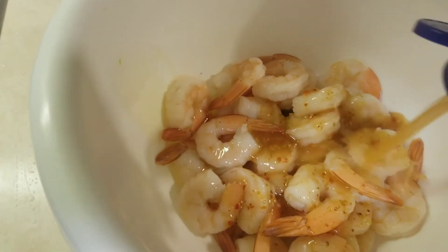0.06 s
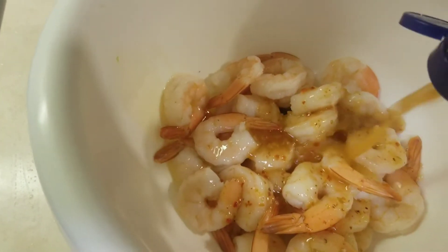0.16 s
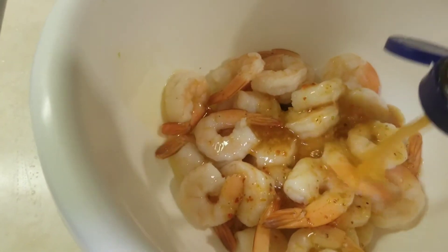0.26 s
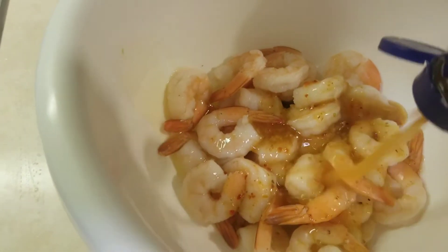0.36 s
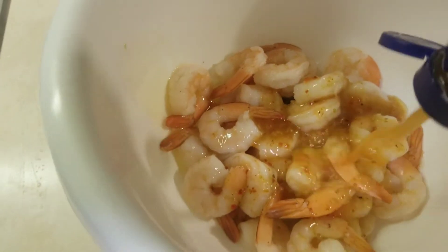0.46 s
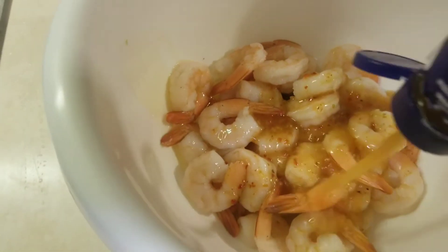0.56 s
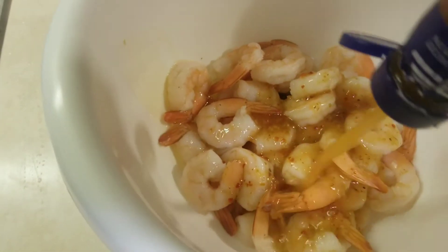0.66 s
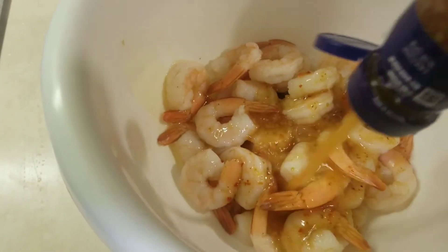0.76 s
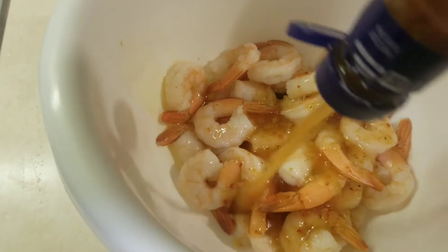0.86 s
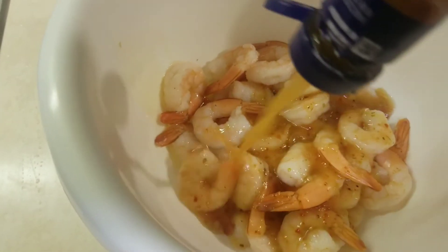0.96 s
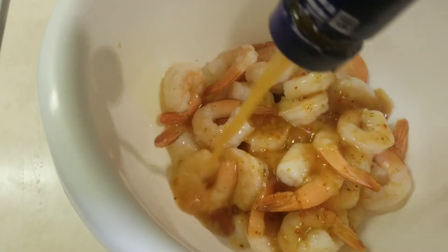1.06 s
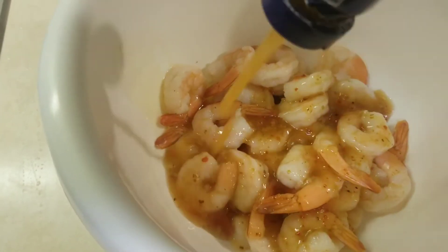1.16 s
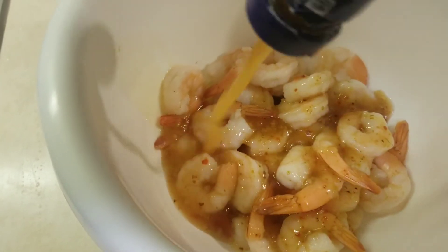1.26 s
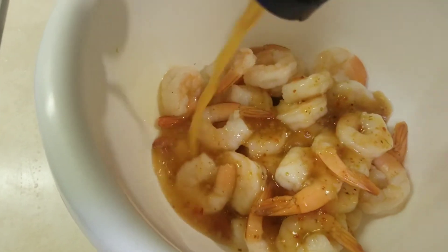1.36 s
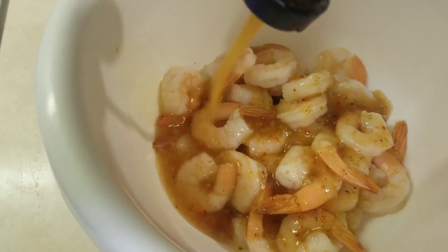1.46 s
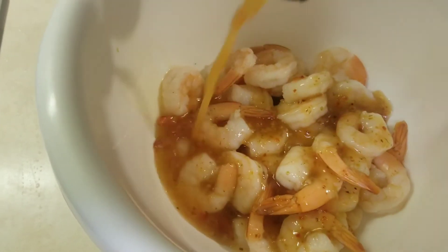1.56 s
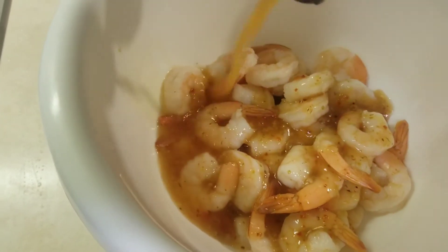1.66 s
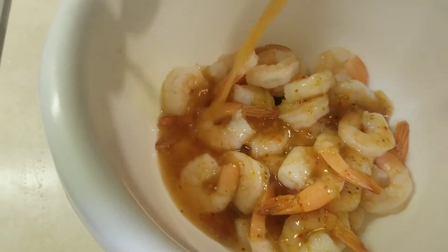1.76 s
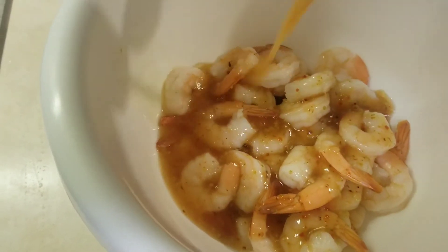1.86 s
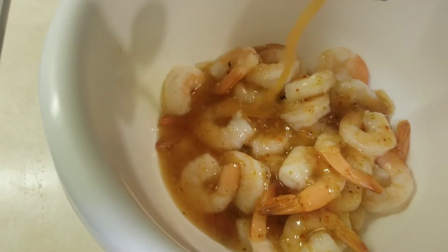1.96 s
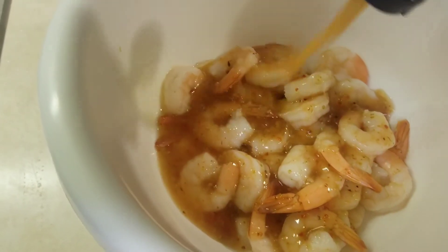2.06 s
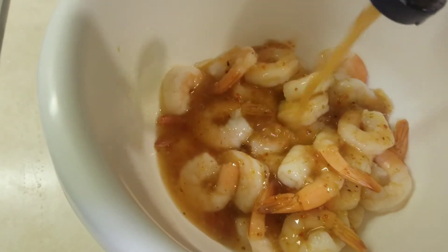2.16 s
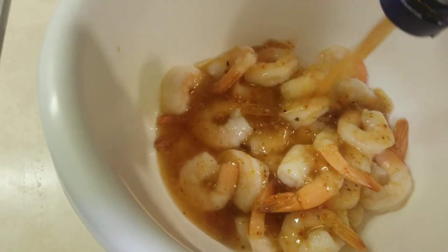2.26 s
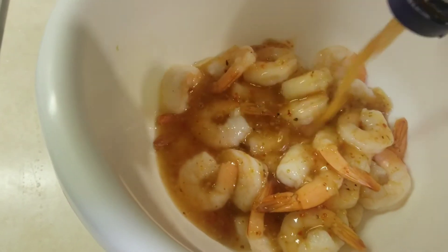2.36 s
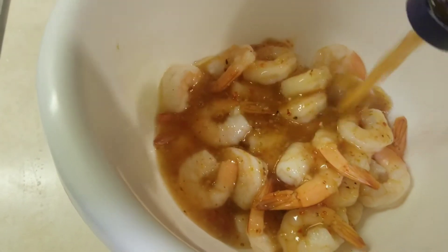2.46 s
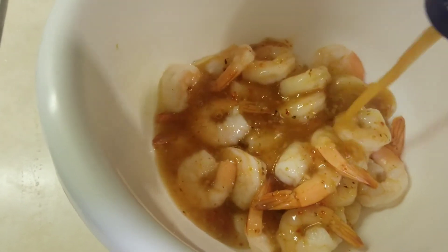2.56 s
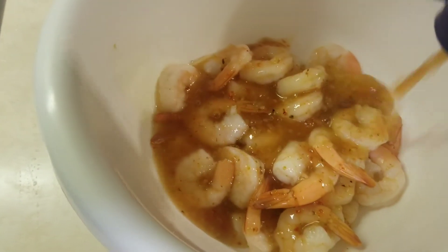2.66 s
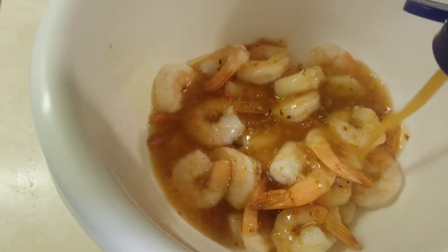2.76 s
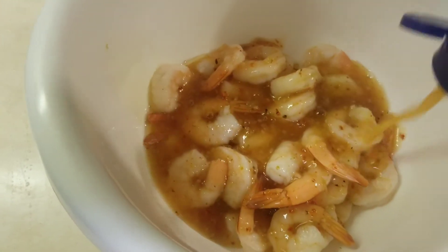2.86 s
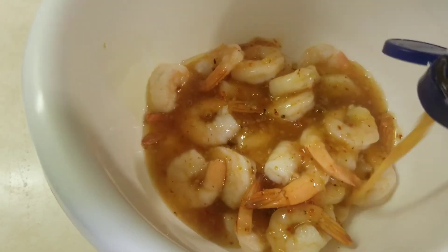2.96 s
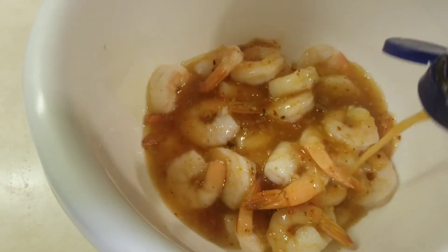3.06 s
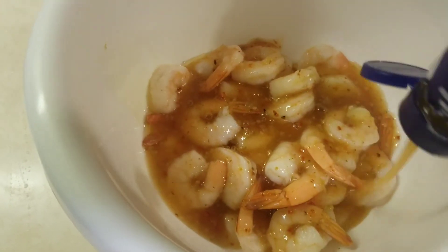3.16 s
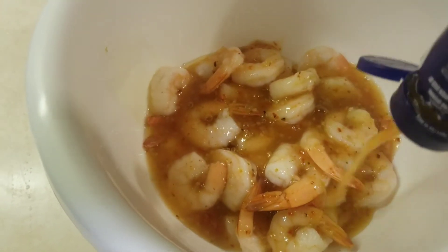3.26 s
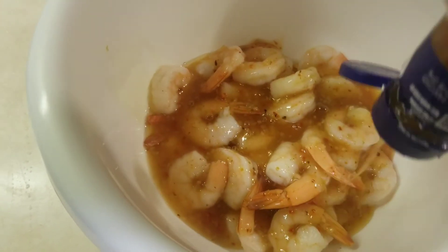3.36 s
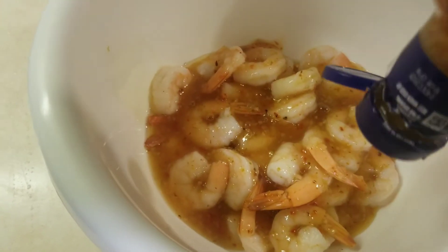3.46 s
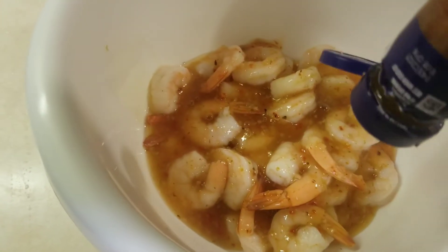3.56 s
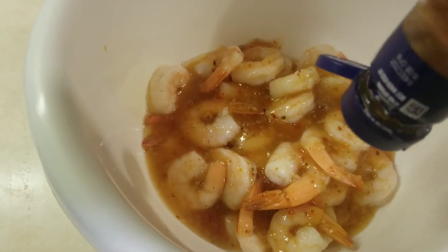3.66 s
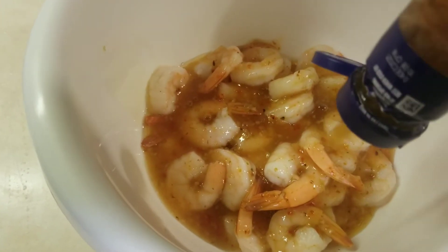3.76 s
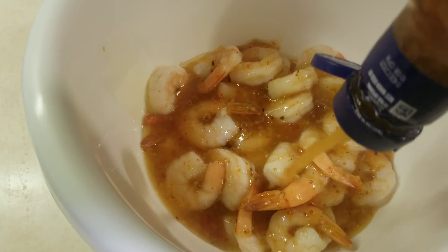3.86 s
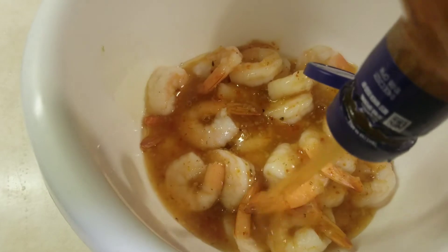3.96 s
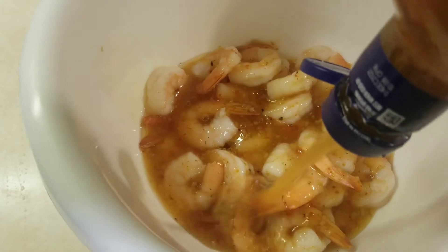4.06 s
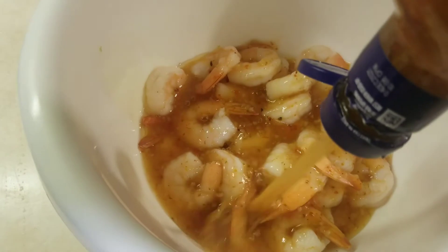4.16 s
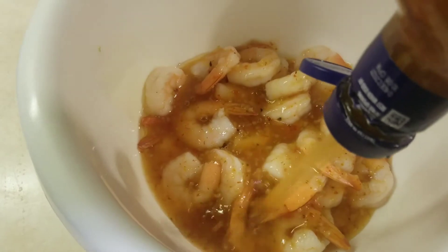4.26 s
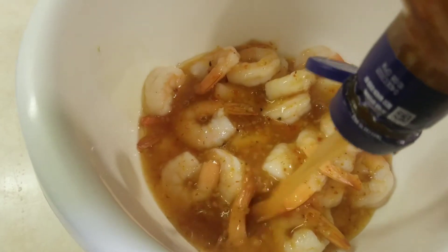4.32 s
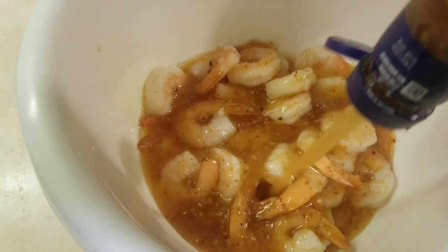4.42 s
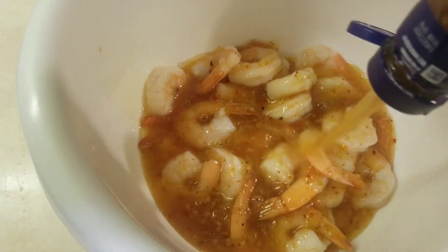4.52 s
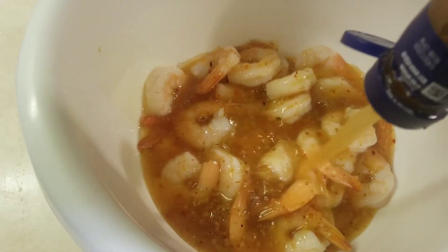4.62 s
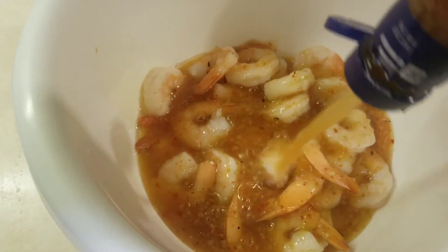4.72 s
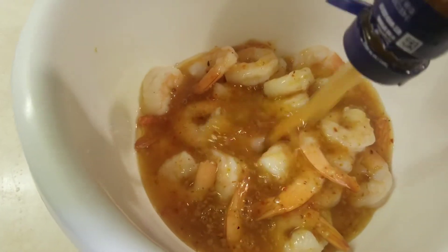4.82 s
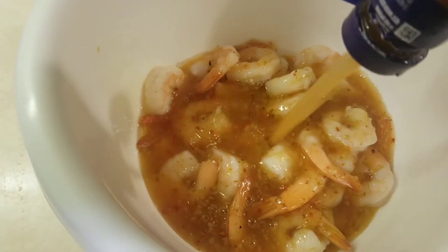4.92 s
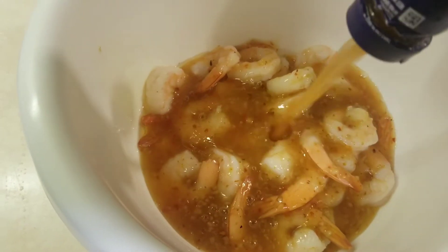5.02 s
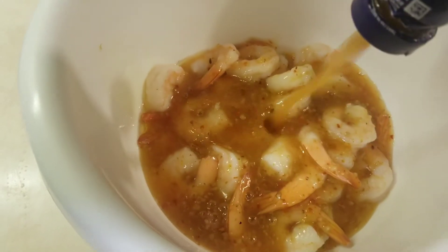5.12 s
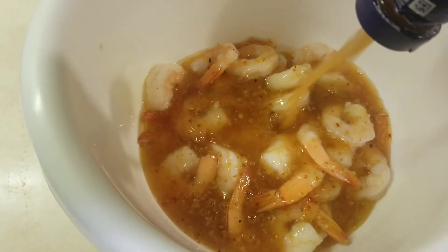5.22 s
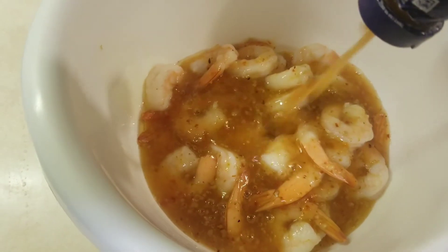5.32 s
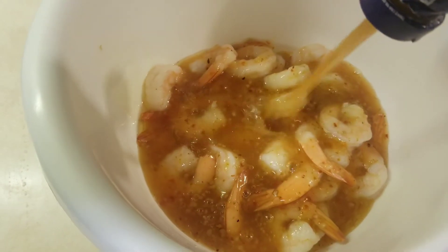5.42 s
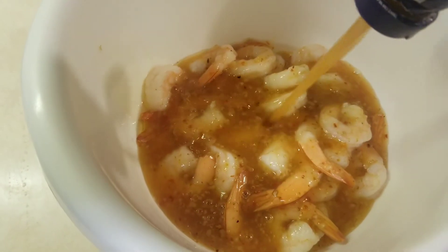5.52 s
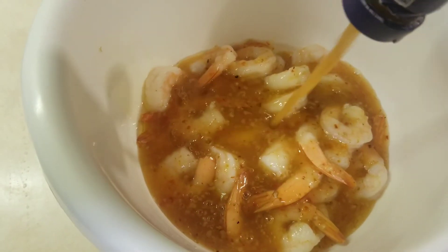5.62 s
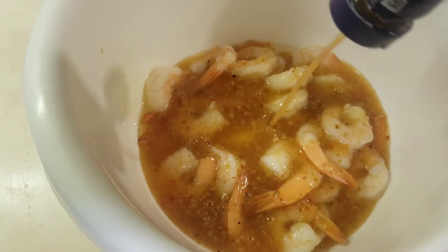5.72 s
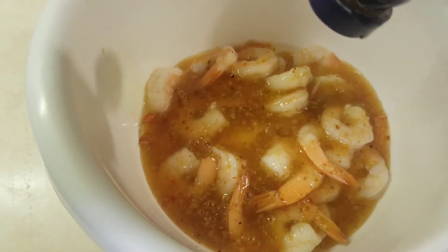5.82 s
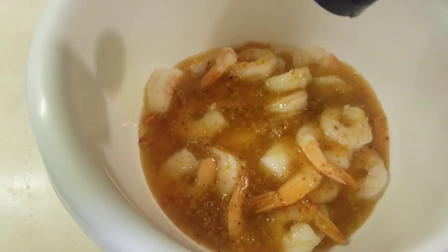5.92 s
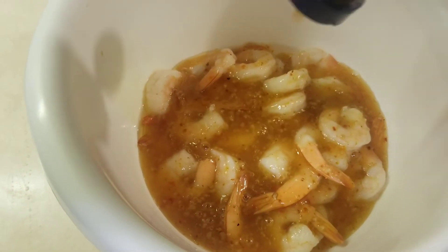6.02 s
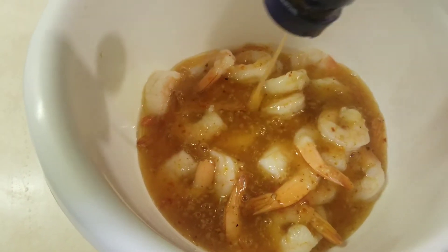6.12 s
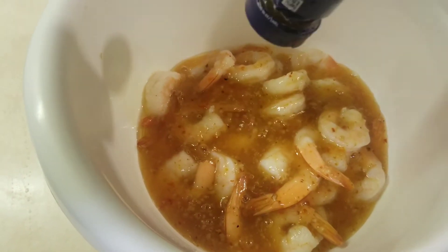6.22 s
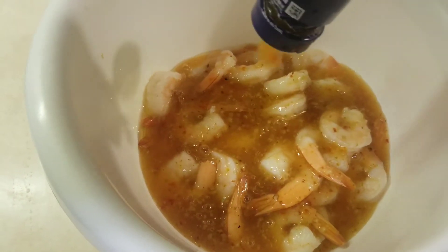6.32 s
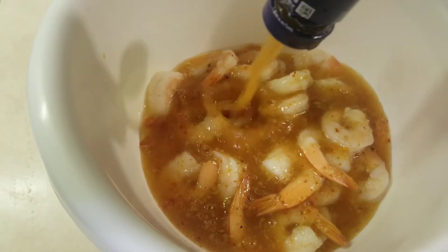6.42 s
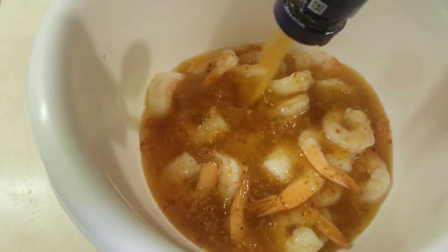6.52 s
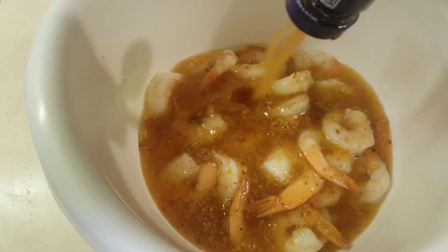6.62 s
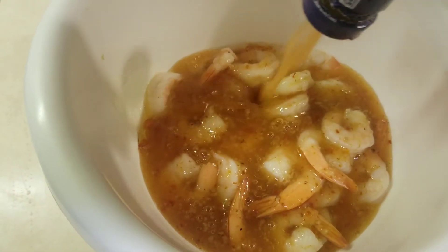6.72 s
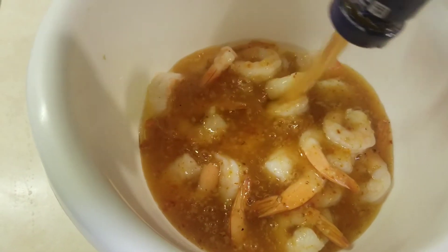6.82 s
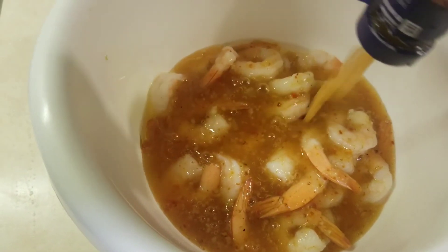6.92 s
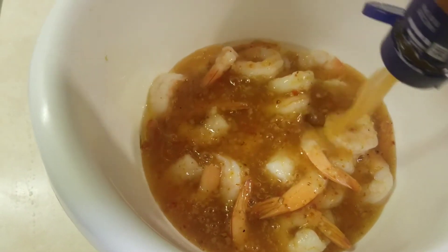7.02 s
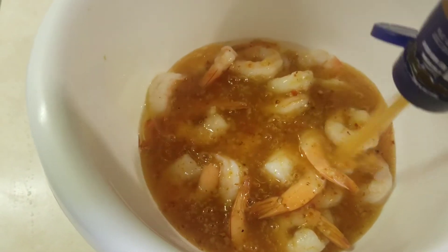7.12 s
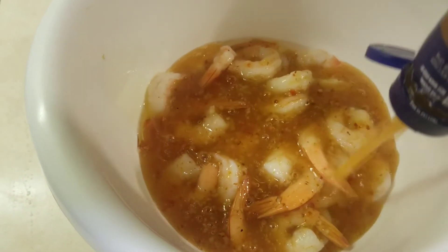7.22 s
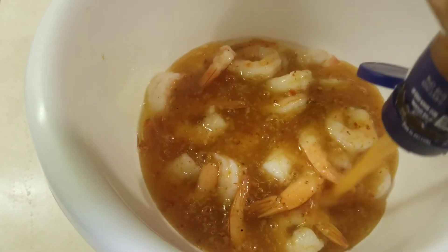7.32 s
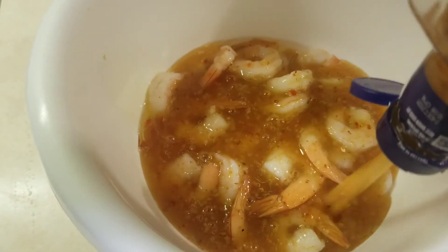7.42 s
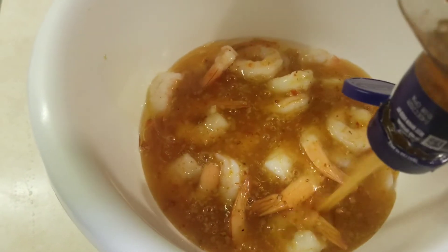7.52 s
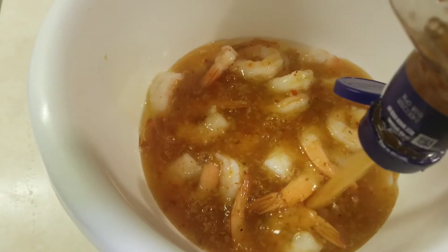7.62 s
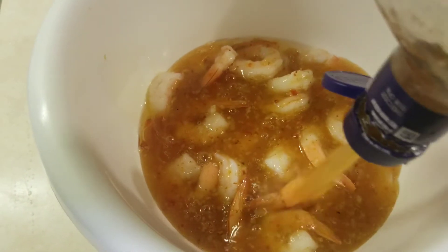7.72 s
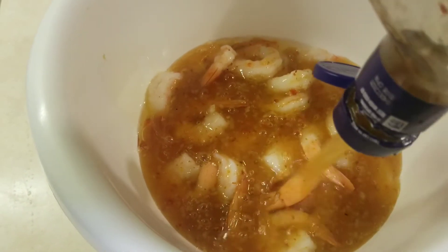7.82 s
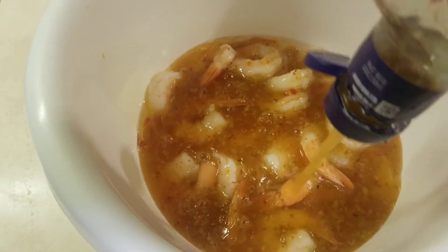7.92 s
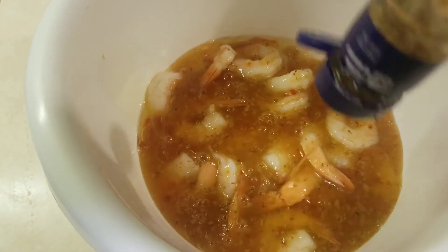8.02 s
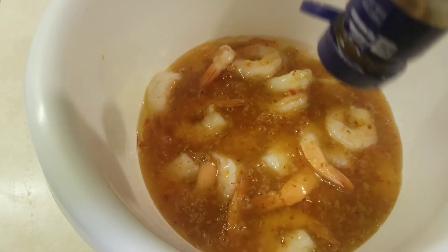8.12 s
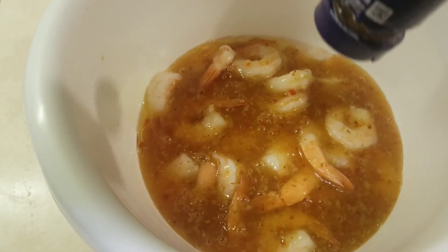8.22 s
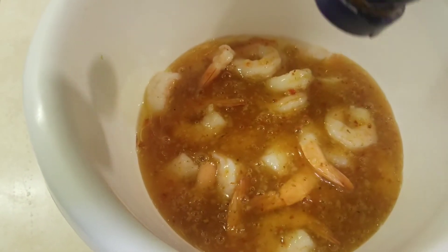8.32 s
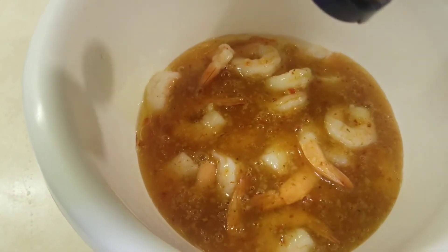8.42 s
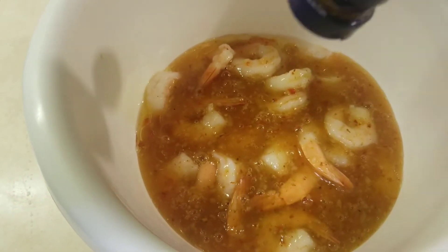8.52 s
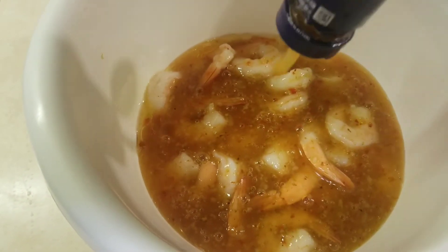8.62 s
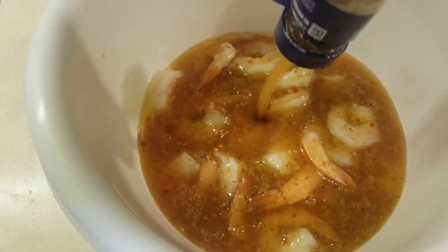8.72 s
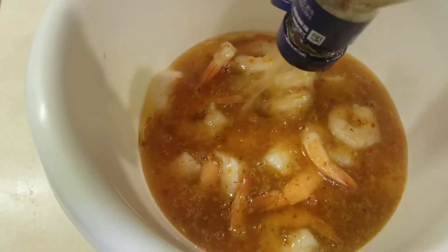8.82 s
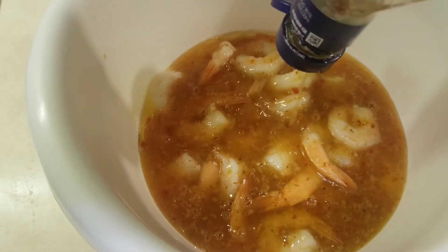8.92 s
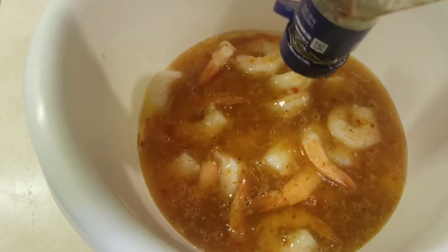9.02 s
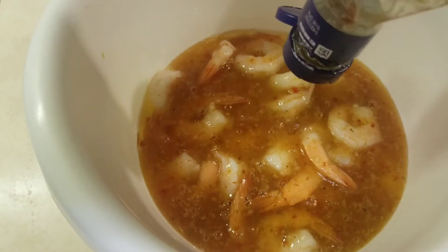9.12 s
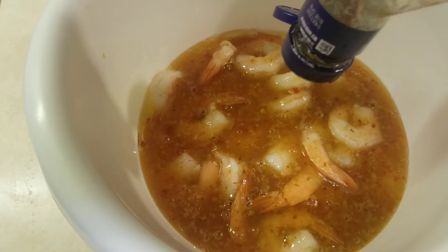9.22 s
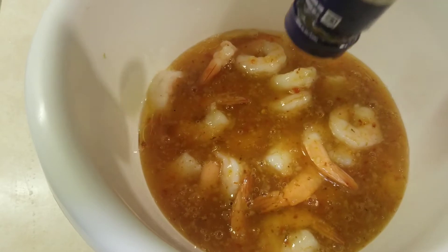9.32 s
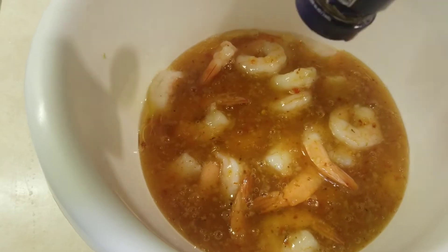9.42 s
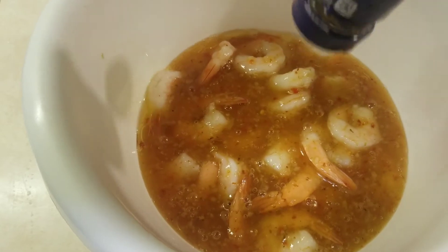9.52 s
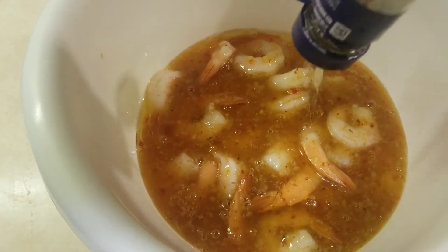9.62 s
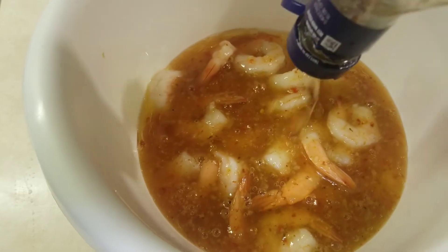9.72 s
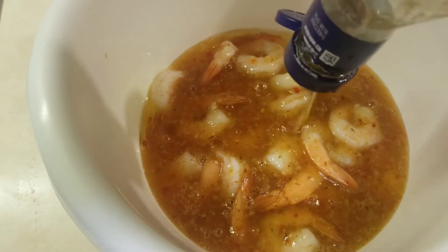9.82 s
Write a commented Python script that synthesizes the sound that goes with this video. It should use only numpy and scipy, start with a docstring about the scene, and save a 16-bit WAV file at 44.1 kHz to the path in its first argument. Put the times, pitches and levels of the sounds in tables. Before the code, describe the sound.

In a quiet home kitchen, very close to the microphone, dressing is poured from a plastic bottle over shrimp in a bowl. A light wet trickle crackles first, then the bottle gulps air and pops. A second, fuller squeeze splashes and bubbles into the pool, then a third. Finally the nearly empty bottle spits raspy air, its walls snap, and low glugs ring.

```python
"""Dressing squeezed onto shrimp

Thick dressing pours from a plastic bottle into a large bowl, close by in a kitchen: three squeezes drive
splashes, trapped bubbles, fizz and drumming, all as shaped noise and short damped rings. Films burst with
ringing cavities, air sputters through the nozzle as coloured crackle, gulped air rings low and the walls
snap as sets of modes. Bowl echoes, a short kitchen tail, room air and a faint appliance hum lie around it."""
import sys
import numpy as np
from scipy import signal
from scipy.fft import rfft, irfft, next_fast_len
from scipy.io import wavfile
from scipy.ndimage import map_coordinates

SR = 44100
rng = np.random.default_rng(int(sys.argv[2]) if len(sys.argv) > 2 else 0)


def generate_wav(signal):
    """Clip the signal to [-1, 1] and save it as 16-bit WAV at the path in sys.argv[1]."""
    frames = np.transpose(np.atleast_2d(signal))
    scaled = np.clip(frames, -1, 1) * 32767
    pcm = np.round(scaled).astype(np.int16)
    wavfile.write(sys.argv[1], SR, pcm)


N = 435708
T = np.arange(N) / SR

# stereo lean of the near sources: f/Hz, left re right/dB
LEAN = [(200, 2.5), (500, -2), (1000, 5), (2200, 15), (4000, 8), (7000, -4), (12000, -1)]
# bottle wall buckling: t/s, level/dB, thump re level/dB (before a 2 dB cut), thump f/Hz, brightness f/Hz,
# wall tension as pitch ratio, panel ring re level/dB, panel f/Hz
SNAPS = [(3.5722, -14, -2, 213, 3200, 1.07, -0.5, 610), (5.855, -12, -1, 201, 5000, 1.02, -18, 850),
         (8.112, -13, 1, 188, 4870, 1.06, -15, 530), (8.4257, -13.5, 9.5, 227, 1790, 1.1, -0.5, 840),
         (8.482, -20.5, 3.5, 200, 2280, 1.32, 5, 945), (9.2256, -16.5, -1, 197, 3300, 1, -5, 686),
         (9.445, -14.5, 8, 237, 1860, 1.01, 0, 830), (9.5033, -23, 0, 200, 1870, 1.18, 6.5, 856)]
CAVITY_WAVER = 0.08  # pitch wander of a collapsing cavity, share (std)


def amp(db):
    """Decibels to gain."""
    return 10 ** (np.asarray(db) / 20)


def unit(x):
    """Scale to rms 1."""
    return x / np.sqrt(np.mean(x ** 2) + 1e-20)


def along(points, hz):
    """Read (f/Hz, value) points on a log-frequency axis."""
    f, v = np.transpose(points)
    return np.interp(np.log(hz + 1), np.log(f + 1), v)


def filtered(x, response):
    """Apply a response of frequency to x by FFT."""
    n = x.shape[-1]
    m = next_fast_len(n + min(n, 8192))
    spectrum = rfft(x, m) * response(np.fft.rfftfreq(m, 1 / SR))
    return irfft(spectrum, m)[..., :n]


def wobble(rate_hz):
    """Smooth random curve, rate_hz knots a second."""
    knots = rng.standard_normal(int(N * rate_hz / SR) + 4)
    return map_coordinates(knots, [T * rate_hz])


def wavering(share, count=24):
    """Random pitch bends of one cavity as it changes shape."""
    return share * rng.standard_normal(count)


def panned(db):
    """Left and right gains of constant power, left db above right."""
    ratio = amp(np.atleast_1d(db))
    return np.array([ratio, np.ones_like(ratio)]) * np.sqrt(2 / (1 + ratio ** 2))


def add(track, s, sound):
    """Mix a sound into a track at time s."""
    part = track[:, max(round(s * SR), 0):][:, :sound.shape[-1]]
    part += sound[..., :part.shape[-1]]


def spread(pair, spectrum, lean=LEAN):
    """Turn two unrelated signals into coloured stereo of rms 1, alike in the bass."""
    # f/Hz, left-right correlation
    alike = [(100, 0.93), (500, 0.69), (1500, 0.046), (4000, 0.054), (10000, 0.061)]

    def mid_side(hz):
        turn = np.arccos(np.clip(along(alike, hz), -1, 1)) / 2
        return amp(along(spectrum, hz)) * [np.cos(turn), np.sin(turn)]

    mid, side = filtered(pair, mid_side)
    stereo = np.array([mid + side, mid - side])
    return unit(filtered(stereo, lambda hz: panned(along(lean, hz))))


def ring(hz, life, attack, rise=0., lag=0., bends=(0, 0)):
    """Damped oscillation, envelope peak 1; pitch rises and bends as it dies, right side lags by lag/rad."""
    t = np.arange(int(8 * life * SR) + 8) / SR
    swell = (1 - np.exp(-t / attack)) * np.exp(-t / life)
    bend = np.interp(t, np.linspace(0, t[-1], len(bends)), bends)
    pitch_ratio = 1 + bend + rise * (np.tanh(t / life / 2) - .5)
    phase = 2 * np.pi * hz * np.cumsum(pitch_ratio) / SR
    return swell / swell.max() * np.sin(phase - np.array([[0], [lag]]))


def click(life, spectrum, size=1536):
    """Short decaying burst of coloured noise."""
    t = np.arange(size) / SR
    noise = rng.standard_normal((2, size))
    return unit(filtered(noise, lambda hz: amp(along(spectrum, hz)))) * np.exp(-t / life)


def crackle(per_second, size_db, hiss):
    """Two channels of tiny ruptures of very unequal size over a smooth hiss."""
    hit = rng.random(N) < per_second / SR
    size = amp(size_db * np.minimum(rng.exponential(size=N), 4))
    return unit(hit * size * rng.standard_normal((2, N))) + hiss * rng.standard_normal((2, N))


def bubbles(times, centre_hz, range_octaves, cycles, size_db, level_db=0):
    """Small damped bubbles of scattered pitch and size, one at each time, rising slightly in pitch."""
    pitch, size, pan, lag = rng.standard_normal((len(times), 4)).T[:, :, None]
    hz = np.reshape(centre_hz, (-1, 1)) * 2 ** (range_octaves * np.tanh(.7 * pitch))
    t = np.arange(int(4 * cycles * SR / np.mean(centre_hz)) + 64) / SR
    age = t * hz / cycles  # large bubbles ring longer
    gain = amp(size_db * np.minimum(size, 2) + np.reshape(level_db, (-1, 1)))
    swell = gain * (1 - np.exp(-5 * age)) * np.exp(-age) * (1 - (t / t[-1]) ** 2)
    phase = 2 * np.pi * hz * t * (1 + 0.045 * np.tanh(age))
    right_lag = (1.87 + lag) * np.minimum(hz / 3000, 1)
    where = (np.maximum(times, 0)[:, None] * SR).astype(int) + np.arange(len(t))
    left, right = panned(along(LEAN, hz) + 2 * pan)
    waves = left * swell * np.sin(phase), right * swell * np.sin(phase - right_lag)
    return np.array([np.bincount(where.ravel(), wave.ravel(), N)[:N] for wave in waves])


def background():
    """Room air as coloured noise and the slightly unsteady hum of an appliance as wavering sines."""
    # f/Hz, rms level/dB before a 2 dB lift
    hum_tones = [(118.4, -80.5), (193.8, -70.5), (333.8, -66.5), (1184, -76)]
    # f/Hz, relative level per Hz/dB
    air = [(15, -26), (25, -8), (53, 2.5), (82, -17), (123, 4), (149, -10), (242, -5.5), (277, -12),
           (427, -5.5), (936, -25), (1160, -13.5), (1500, -23), (2900, -23), (3600, -15), (4400, -26.5),
           (7710, -39.5), (16000, -34)]
    hum = np.zeros(N)
    for hz, db in hum_tones:
        tone = np.sin(2 * np.pi * hz * T + 0.63 * wobble(4.9))
        hum += amp(db + wobble(3.0)) * np.sqrt(2) * tone
    room = spread(rng.standard_normal((2, N)), air, lean=[(200, 0), (2000, 1)])
    return amp(2.0) * hum + amp(-57.0) * room


def kitchen(x):
    """Short diffuse tail of decaying noise, different for each place of the bottle: redrawn every 0.5 s."""
    # f/Hz, t60/s
    decay = [(150, 0.088), (400, 0.36), (1000, 0.46), (3000, 0.38), (7000, 0.29), (15000, 0.31)]
    colour = [(100, 7.0), (350, 4.5), (600, 2.5), (1000, -4.0), (3000, 2.5), (6000, 4.5), (14000, 2.5)]
    lean = [(500, -1.1), (2000, 0.35), (8000, -0.93)]
    block = SR // 2
    out = np.zeros((2, N))
    for start in range(0, N, block):
        hz, t, z = signal.stft(rng.standard_normal((2, block)), SR, nperseg=256)
        decaying = z * amp(-60 * t / along(decay, hz)[:, None])
        tail = spread(signal.istft(decaying, SR, nperseg=256)[1], colour, lean=lean)
        wet = signal.fftconvolve(x[:, start:start + block], tail / np.sqrt(tail.shape[1]), axes=1)
        add(out, start / SR + 0.0071, wet)
    return out


def bowl_echoes(x):
    """Weak copies off bowl wall and counter, redrawn every 0.2 s as the bottle moves; alike in the bass."""
    colour = [(100, 0.26), (700, 0.84), (5000, 2.3), (15000, 1.6)]
    count, block = 9, SR // 5
    out = np.zeros((2, N))
    for start in range(0, N, block):
        walls = np.zeros((2, SR // 20))
        for side in walls:
            delays = rng.uniform(0.0021, .016, count)
            signs = rng.choice([-1, 1], count)
            side[(delays * SR).astype(int)] = signs * np.exp(-delays / 0.0037)
        walls = spread(walls, colour, lean=[(500, 0.031), (2000, 0.29)])
        echo = signal.fftconvolve(x[:, start:start + block], walls / np.sqrt(walls.shape[1]), axes=1)
        add(out, start / SR, echo)
    return out


def glugs():
    """A large bubble of air breaks into the bottle and rings low, with a wet click of the breaking film."""
    # air gulps: t/s, level/dB, f/Hz, life/s
    gulps = [(0.6053, -23, 115, 0.0057), (3.368, -27.5, 380, 0.0074), (3.401, -21.5, 338, 0.0028),
             (3.449, -18.5, 325, 0.0048), (3.5124, -25.5, 360, 0.00098), (3.7193, -19.5, 248.5, 0.011),
             (5.803, -27, 254, 0.0039), (5.966, -19, 244, 0.0069), (5.969, -30, 694, 0.011),
             (5.997, -24, 300, 0.0023), (6.602, -27.5, 328, 0.00092), (8.116, -16, 354, 0.0033),
             (8.9307, -19, 324, 0.0035), (8.987, -10, 351, 0.0076), (9.29, -25.5, 395, 0.00097),
             (9.654, -28, 330, 0.0053), (9.7097, -15, 320, 0.0021), (9.7465, -1.4, 350, 0.0041)]
    waver = 0.084  # pitch wander, share (std)
    wet_click_db, wet_db_per_octave, typical_hz = -12, 7, 337  # lower gulps click less
    film = [(300, 6.0), (1100, 1.5), (2500, -11), (5000, -26.0), (16000, -30.5)]
    out = np.zeros((2, N))
    for s, db, hz, life in gulps:
        bubble = ring(hz, life, attack=0.00079, rise=0.0094, bends=wavering(waver))
        click_db = db + wet_click_db + wet_db_per_octave * np.log2(hz / typical_hz)
        add(out, s, amp(db) * bubble * panned(0.75))
        add(out, s, amp(click_db) * click(0.003, film))
    return out


def creases():
    """Small dry cracks run through the plastic in the first moments of each flip, low-passed."""
    count, level_db, mean_delay_s = 8, -17, 0.0021  # level re snap
    s, db, _, _, bright_hz = np.repeat(SNAPS, count, axis=0).T[:5]
    times = s + rng.exponential(mean_delay_s, len(s))
    cracks = bubbles(times, centre_hz=np.sqrt(bright_hz * 1300), range_octaves=0.83, cycles=0.98,
                     size_db=-4.5, level_db=db + level_db)
    return signal.sosfilt(signal.butter(2, 4500, fs=SR, output="sos"), cracks)


def snaps():
    """The wall flips: its modes and the flipped panel ring briefly, the air inside thumps low."""
    # wall modes: f/Hz at tension 1, level re snap/dB, life/s
    wall = [(341, -19, 0.025), (436, -15, 0.0027), (535, -0.5, 0.0014), (792, -2.5, 0.0025),
            (850, 5.5, 0.00055), (1370, -4.5, 0.0017), (1586, -3, 0.00097), (1890, -0.5, 0.0011),
            (2356, -3.5, 0.0014), (2790, -11, 0.0027), (3210, -6, 0.0016), (3560, -1.5, 0.0011),
            (4360, -3, 0.00023)]
    panel_life_s, thump_life_s = 0.0036, 0.0021
    out = np.zeros((2, N))
    for s, db, thump_db, thump_hz, bright_hz, tension, panel_db, panel_hz in SNAPS:
        for (hz, level, life), (size, detune, lag) in zip(wall, rng.standard_normal((len(wall), 3))):
            hz = hz * tension * (1 + 0.028 * detune)
            soft = 1 / np.sqrt(1 + (hz / bright_hz) ** 8)  # a slow flip leaves the high modes still
            mode = np.sign(lag) * ring(hz, life, attack=0.0013, lag=lag * min(hz / 2500, 1))
            add(out, s, amp(db + level + 0.5 * size) * soft * mode * panned(along(LEAN, hz)))
        thump = ring(thump_hz, thump_life_s, attack=0.0033, lag=0.04)
        panel = ring(panel_hz, panel_life_s, attack=0.00038, lag=0.58)
        add(out, s, amp(db + thump_db - 2.0) * thump)
        add(out, s, amp(db + panel_db) * panel)
        # the wall shudders for a moment as it settles
        settling = [(150, -8), (400, 0), (900, -1), (bright_hz, -9), (bright_hz * 2, -26),
                    (bright_hz * 10, -36)]
        flip = [(300, -4), (900, 0), (bright_hz, -5), (bright_hz * 2, -28), (bright_hz * 10, -38)]
        add(out, s + 0.0045, amp(db - 20.5) * click(0.032, settling, size=5120))
        add(out, s, amp(db - 20.5) * click(0.011, flip))
    return out


def spitting():
    """Loudness of air bursting one film after another, each a sudden start and short decay; rms 1."""
    per_second, decay_s, scatter_db, steady_air = 260, 0.0026, 1, .8
    count = int(2 * per_second * N / SR)
    gap, size = rng.uniform(-1, 1, (count, 2)).T
    at = (np.cumsum(1 + .8 * gap) / per_second * SR).astype(int)
    kicks = np.bincount(at, amp(scatter_db * size), N)[:N]
    bursts = signal.lfilter([1], [1, -np.exp(-1 / (decay_s * SR))], kicks)
    return unit(steady_air + unit(bursts))


def sputters():
    """Air tears through dressing in the nozzle: ragged rasp coloured by the neck, low gurgles, fine spray."""
    # air and dressing spitting out: t/s, length/s, rasp/dB, spray/dB, gurgle/dB (before the spitting)
    spurts = [(3.311, 0.047, -40.5, -47, -58), (3.349, 0.016, -31.5, -30, -38),
              (3.378, 0.018, -31, -33.5, -48), (3.424, 0.015, -44, -39, -46),
              (3.603, 0.017, -34.5, -43, -41.5), (5.7, 0.067, -31.5, -35, -42.5),
              (7.934, 0.035, -30.5, -33.5, -45), (8.097, 0.026, -35, -40, -39),
              (8.466, 0.015, -37.5, -46, -39), (8.747, 0.052, -21, -35, -25), (8.967, 0.057, -43, -48, -49),
              (9.124, 0.14, -48.5, -48, -49), (9.574, 0.15, -44.5, -47.5, -50)]
    # rasp colour: f/Hz, relative level per Hz/dB
    throat = [(60, -1), (150, 7), (350, -10.5), (600, -14.5), (1100, -10), (1500, -11), (2000, 3.5),
              (2800, -4.5), (3700, -17), (5500, -11.5), (8000, -20.5)]
    # spray colour: f/Hz, relative level per Hz/dB
    spray_colour = [(1500, -4), (4000, 4), (6000, 1.5), (8000, -8), (10500, 5.5), (13000, -0.5),
                    (16000, -4)]
    # resonances of bottle and neck: f/Hz, width/Hz, gain/dB
    resonances = [(337, 62, 19), (603, 155, 29.5), (786, 150, -35), (1150, 130, 11), (1745, 90, 16),
                  (3580, 280, 18)]
    rise_s, fall_s = 0.018, 0.021
    neck_swing = 0.043  # shift of the resonances by liquid in the hole, share

    def neck(hz):
        return amp(sum(db / (1 + (2 * (hz - centre) / width) ** 2) for centre, width, db in resonances))

    def scattered(count, **settings):
        return unit(bubbles(rng.random(count) * N / SR, **settings))

    tearing = spread(crackle(per_second=2600, size_db=1.2, hiss=.3), throat)
    # the neck's resonances slide as it fills and clears: crossfade three shifted filters
    fill = np.tanh(wobble(28))
    rasp = np.zeros((2, N))
    for k in (-1, 0, 1):
        shifted = unit(filtered(tearing, lambda hz: neck(hz * (1 + k * neck_swing))))
        rasp += np.maximum(1 - np.abs(fill - k), 0) * shifted
    count = 9000
    films = scattered(count, centre_hz=1900, range_octaves=1.4, cycles=6, size_db=2)
    rasp = unit(unit(rasp) + .6 * films)
    # sound bounces along the nearly empty bottle: a comb every 385 Hz
    rasp = unit(filtered(rasp, lambda hz: 1 / (1 - .45 * np.exp(-2j * np.pi * hz / 385))))
    beads = scattered(count, centre_hz=4300, range_octaves=.7, cycles=9, size_db=3)
    mist = spread(crackle(per_second=3000, size_db=1.5, hiss=.3), spray_colour)
    spray = unit(mist + .7 * beads)
    gurgle = scattered(count // 3, centre_hz=584, range_octaves=1.24, cycles=2.5, size_db=2.0)
    out = np.zeros((2, N))
    for s, length, rasp_db, spray_db, gurgle_db in spurts:
        rise = np.clip((T - s) / rise_s, 0, 1) ** 2
        push = rise * np.exp(-np.maximum(T - s - length, 0) / fall_s)
        out += push * (amp(rasp_db) * rasp + amp(spray_db) * spray + amp(gurgle_db) * gurgle)
    return spitting() * out


def drumming():
    """Uneven low rumble of the bowl under the stream: low coloured noise of wandering level, rms 1."""
    colour = [(40, -16), (75, -6.5), (105, 1.0), (150, -20.5), (300, -18.5), (700, -19.5), (2000, -39)]
    bowl = spread(rng.standard_normal((2, N)), colour)
    return unit(amp(3.9 * wobble(17)) * bowl)


def plunges():
    """In the pool between the shrimp each blob splats and drags down a large bubble; the bowl drums harder."""
    # stream entering the open pool: start/s, end/s, plop level/dB, middle plop f/Hz
    spans = [(4.202, 4.444, -36, 1560), (4.924, 5.672, -38, 900), (6.549, 6.815, -36, 1370),
             (7.068, 7.19, -41.5, 1110)]
    plops_per_s, plop_life_s, splat_db = 62, 0.0012, -10  # splat re plop
    fade_s, drum_db = 0.051, -12.5  # edges of the drumming; its level re plops
    splat_colour = [(400, -17), (1300, 1), (2200, 7), (5000, 1), (8000, -5.5), (16000, -21)]
    out, depth = np.zeros((2, N)), np.zeros(N)
    for (start, end, db, plop_hz), draws in zip(spans, rng.standard_normal((len(spans), 48, 4))):
        depth += amp(db) * np.clip(np.minimum(T - start, end - T) / fade_s + 1, 0, 1)
        for k, (late, size, pitch, lag) in enumerate(draws):
            s = start + (k + 0.5 * late) / plops_per_s
            if s >= end:
                continue
            hz = plop_hz * 2 ** (.32 * pitch)
            plop = ring(hz, plop_life_s, attack=0.0032, rise=0.079, lag=0.26 * lag,
                        bends=wavering(CAVITY_WAVER))
            add(out, s, amp(db + 1.8 * size) * plop * panned(along(LEAN, hz)))
            add(out, s, amp(db + splat_db + 3.2 * size) * click(0.0015, splat_colour))
    return out + amp(drum_db) * depth * drumming()


def pouring():
    """Flow in dB re a full stream, and pitch of the bubbles it traps, at every sample."""
    # three squeezes, each a curve: t/s, flow/dB, trapped-bubble f/Hz
    squeezes = [
        [(0, -39.5, 3160), (.3, -69, 1900), (.6, -71, 3300), (1.0, -63, 2240), (1.17, -58, 4300),
         (1.48, -64, 3620), (1.95, -60, 2600), (2.38, -57, 3300), (2.95, -69.5, 3700)],
        [(3.98, -50, 3200), (4.22, -38.5, 2900), (4.42, -46, 1950), (4.62, -48.5, 3800), (4.95, -38, 3550),
         (5.2, -42.5, 3580), (5.5, -47.5, 3110), (5.66, -49.5, 2250)],
        [(6.45, -51.5, 4140), (6.6, -48.5, 2780), (6.88, -50.5, 3370), (7.02, -46.5, 4600), (7.28, -46, 2170),
         (7.42, -42.5, 3760), (7.6, -38, 4140), (7.75, -41, 3530), (7.92, -46, 2210)],
    ]
    full_flow_db, cut_off_db_per_s = -39, 220  # a full stream; slope of its start and break-off
    flows = []
    for squeeze in squeezes:
        s, db, _ = np.transpose(squeeze)
        outside_s = np.abs(T - np.clip(T, s[0], s[-1]))
        flows.append(np.interp(T, s, db) - cut_off_db_per_s * outside_s)
    s, _, hz = np.vstack(squeezes).T
    return np.max(flows, axis=0) - full_flow_db, np.interp(T, s, hz)


def splashes(count=14):
    """Each fold of the stream slaps down and scatters a cluster of barely ringing droplets; rms 1."""
    folds_per_s, landing_s = 75, .003  # landing: mean delay of droplets after their fold
    folds = int(folds_per_s * N / SR)
    late, size, pitch = np.repeat(rng.uniform(-1, 1, (folds, 3)), count, axis=0).T
    fold_s = (np.repeat(np.arange(folds), count) + late) / folds_per_s
    times = fold_s + rng.exponential(landing_s, len(late))
    return unit(bubbles(times, centre_hz=3100 * 2 ** (.55 * pitch), range_octaves=0.94, cycles=1.57,
                        size_db=2.5, level_db=12.0 * size))


def stream(flow_db, bubble_hz):
    """Folding dressing splashes, traps clusters of small bubbles, fizzes and drums softly on the bowl."""
    # f/Hz, relative level per Hz/dB
    fizz_colour = [(300, -20), (700, -30), (1200, -15), (2200, -11), (5200, -11), (8000, -16.5),
                   (11000, -8.5), (16000, -15.5)]
    # each: level at full flow/dB, dB gained per dB of flow
    bubble_db, bubble_grows = -46, 1.43
    splash_db, splash_grows = -41.5, 1.23
    fizz_db, fizz_grows = -48.5, 0.64
    drum_db, drum_grows = -55.5, 0.41
    folding = amp(10.7 * np.tanh(wobble(45)))
    count = 6000
    at = rng.integers(0, N, count)
    trapped = rng.random(count) < np.sqrt(amp(flow_db[at]))  # a thin trickle traps few; the rest are faint
    small = bubbles(at / SR, centre_hz=bubble_hz[at], range_octaves=1.31, cycles=4.6, size_db=4.0,
                    level_db=np.where(trapped, 0, -40))
    tiny = bubbles(rng.random(count // 4) * N / SR, centre_hz=11500, range_octaves=.45, cycles=9, size_db=5)
    fizz = spread(crackle(per_second=900, size_db=3.5, hiss=.2), fizz_colour) + .2 * unit(tiny)
    return (amp(bubble_db + bubble_grows * flow_db) * unit(folding * small)
            + amp(splash_db + splash_grows * flow_db) * splashes()
            + amp(fizz_db + fizz_grows * flow_db) * unit(folding * fizz)
            + amp(drum_db + drum_grows * flow_db) * drumming())


def stray_pops(flow_db, bubble_hz, count=200):
    """Further bursts at random times, stronger in a fuller stream; rows as in the table of pops()."""
    full_flow_level_db, db_per_flow_db, ring_cycles = -31, .45, 4
    at = rng.integers(0, N, count)
    size, pitch, film, damping = rng.standard_normal((count, 4)).T
    db = full_flow_level_db + db_per_flow_db * flow_db[at] + 2.8 * size
    hz = bubble_hz[at] * 2 ** (0.17 + 0.664 * np.tanh(pitch))
    life = ring_cycles / hz * np.exp(.4 * damping)
    rows = np.transpose([at / SR, db, hz, life, -8 + 11 * np.tanh(film)])
    return rows[db > -48]


def fragments(bursts, count=3):
    """Each bursting bubble breaks into a few short-lived ones, smaller and larger, of nearby pitch."""
    level_db, mean_delay_s = -8, .0022  # level re burst
    s, db, hz = np.repeat(bursts[:, :3], count, axis=0).T
    times = s + rng.exponential(mean_delay_s, len(s))
    return bubbles(times, centre_hz=hz, range_octaves=.85, cycles=3.4, size_db=2, level_db=db + level_db)


def neighbours(bursts, count=5):
    """A few small bubbles pop around each burst, from 2 ms before it to some tens of ms after."""
    level_db, mean_delay_s = -13, .011  # level re burst; delay counts from 2 ms ahead of it
    s, db = np.repeat(bursts[:, :2], count, axis=0).T
    times = s - .002 + rng.exponential(mean_delay_s, len(s))
    return bubbles(times, centre_hz=3240, range_octaves=1.266, cycles=4.2, size_db=2.5,
                   level_db=db + level_db)


def pops(flow_db, bubble_hz):
    """Each film tears with a tick and a wet splat; the open cavity rings, its pitch gliding and wavering."""
    # single bursts in bowl and nozzle, loud and faint: t/s, level/dB, cavity f/Hz, life/s,
    # film tick re level/dB
    single_bursts = [(.0029, -10.5, 3560, 0.0026, -40), (.0105, -32, 4300, 0.00053, -5),
                     (0.0337, -27, 2690, 0.0028, -10), (0.044, -31, 3330, 0.0022, 2.5),
                     (0.067, -29, 3470, 0.0015, -3), (0.1427, -26.5, 1680, 0.0023, -33),
                     (0.1597, -31.5, 9100, 0.0047, 5.5), (0.1835, -14, 3580, 0.00033, -37),
                     (0.207, -23.5, 2020, 0.0018, -26), (.2194, -31.5, 1870, .0014, -7),
                     (0.2273, -36, 1920, 0.0028, 4.5), (.279, -32.5, 2420, .001, -11.5),
                     (.304, -29, 2200, .001, -16), (0.3165, -28, 1600, 0.0024, -28),
                     (0.333, -29, 1830, 0.0046, -12), (0.3511, -23.5, 2500, 0.0021, -11.5),
                     (0.417, -28.5, 2700, 0.0011, -5.5), (0.5063, -36.5, 2460, 0.0016, -4),
                     (.693, -32.5, 4300, 0.0011, -24), (0.717, -27.5, 4100, 0.0011, -7),
                     (0.799, -22.5, 3610, 0.00196, -18), (0.8644, -25.5, 3600, 0.00076, -11),
                     (0.8782, -30.5, 1700, 0.0025, -4), (0.9177, -31.5, 6500, 0.00069, -4.5),
                     (0.9357, -34, 3790, 0.00086, -21), (1.0054, -35.5, 1870, 0.0019, -3),
                     (1.018, -33.5, 1560, 0.0016, -3.5), (1.0505, -40.5, 4800, 0.00088, -1),
                     (1.07, -30.5, 2980, .002, -20), (1.085, -24.5, 2270, 0.0023, -22),
                     (1.098, -26.5, 3590, 0.0023, -24), (1.109, -21, 4870, 0.00061, -9.5),
                     (1.1702, -30, 3430, 0.00078, 5.5), (1.1807, -24.5, 5100, 0.0031, -4),
                     (1.234, -37, 4050, 0.0013, -1), (1.305, -30.5, 4070, 0.0023, -10),
                     (1.3421, -23, 3940, 0.0021, -11.5), (1.4437, -31, 2060, 0.0011, -10),
                     (1.5321, -32, 6660, 0.0015, -4), (1.546, -33.5, 3360, .0015, -23),
                     (1.644, -29, 10000, .001, -6), (1.676, -31.5, 2020, 0.0016, 2),
                     (1.706, -35, 1950, 0.0013, 1), (1.7464, -16.5, 2630, 0.0013, -11.5),
                     (1.798, -23, 4320, 0.00062, -6), (1.856, -13.5, 2620, 0.00097, -17.5),
                     (1.931, -29.5, 1590, 0.0013, -16), (1.9863, -22, 2880, 0.0017, -22),
                     (2.0502, -24, 1910, 0.00098, -7.5), (2.123, -35.5, 10800, 0.0007, 8),
                     (2.158, -43, 10400, .001, -2), (2.1663, -20.5, 2520, 0.0028, -10),
                     (2.1833, -34, 3040, 0.0012, -21), (2.204, -26, 3380, 0.0019, -33),
                     (2.2942, -25, 3600, 0.0022, -32), (2.351, -36, 5660, 0.00094, 4),
                     (2.3672, -28.5, 8900, 0.0033, -4.5), (2.382, -33, 1680, .0015, -3),
                     (2.432, -25, 2000, 0.00056, -4), (2.4414, -30, 1670, 0.002, -18),
                     (2.448, -19, 4650, 0.00031, -28), (2.476, -34.5, 3200, .0015, -14),
                     (2.504, -33.5, 2350, 0.0018, -6), (2.557, -36.5, 3750, 0.0017, -16),
                     (2.645, -34, 3550, .0015, -3), (2.6591, -28.5, 2680, 0.001, -3),
                     (2.7486, -30, 2320, 0.00041, -31), (2.859, -38, 3800, 0.0023, -13),
                     (3.165, -45, 3560, .003, -20), (3.348, -22, 1210, 0.0011, -2.5),
                     (3.373, -23, 3510, 0.0026, -5), (3.395, -22, 5220, 0.0014, -14),
                     (3.45, -25.5, 3980, 0.0042, -3), (3.5122, -23.5, 3060, 0.00027, -7),
                     (3.7205, -32, 5850, 0.00087, -3), (3.773, -24.5, 3630, 0.00074, -17),
                     (3.788, -24, 1600, 0.0011, -16), (3.868, -34, 4440, .0012, -11),
                     (3.968, -35.5, 10800, 0.0011, -14), (4.014, -18.5, 5400, 0.00045, -37),
                     (4.028, -26, 2410, 0.0018, 1), (4.0546, -16, 2135, 0.0029, -17.5),
                     (4.118, -23.5, 3280, 0.0036, -10.5), (4.1641, -12.5, 3385, 0.003, -20),
                     (4.199, -23.5, 2340, .002, -8), (4.206, -28, 4390, 0.0013, -14),
                     (4.256, -27.5, 1250, 0.0022, -11), (4.3036, -22.5, 3540, 0.0014, -8),
                     (4.336, -24.5, 1960, 0.0027, -4.5), (4.3675, -19.5, 1840, 0.0003, -13),
                     (4.422, -31.5, 3800, 0.0011, -12), (4.44, -29.5, 1260, 0.0016, -5),
                     (4.524, -19.5, 2334, 0.0056, -15), (4.558, -25, 2550, 0.0065, -5),
                     (4.614, -32, 3870, 0.002, 2), (4.681, -17, 2390, 0.00073, -5),
                     (4.706, -29, 3680, 0.0065, -1.5), (4.712, -22, 2500, .002, -10),
                     (4.729, -27, 2160, .002, -10), (4.753, -30, 8030, .001, 6),
                     (4.762, -24, 3720, 0.0021, -8), (4.781, -21.5, 4250, 0.0011, -9),
                     (4.831, -18.5, 4420, 0.001, -32), (4.889, -14, 4260, 0.0014, -30),
                     (4.9263, -20, 1360, 0.00071, 0), (4.933, -19.5, 2580, 0.0016, -20),
                     (4.946, -27, 4290, 0.0024, -3), (4.9614, -27, 6900, 0.0018, -21),
                     (5.003, -20, 4380, 0.0014, -25), (5.038, -8, 4480, 0.00057, -25),
                     (5.0577, -21.5, 2270, 0.0039, -8), (5.0858, -15.5, 2530, 0.0014, -17),
                     (5.104, -24, 4640, 0.0015, -9), (5.123, -16.5, 2180, 0.0011, -11),
                     (5.129, -22, 4390, .0015, -22), (5.177, -11.5, 5110, 0.0022, -28),
                     (5.2095, -28.5, 2300, 0.0019, -13), (5.21, -30.5, 860, .0018, -12),
                     (5.236, -26, 5530, 0.0011, -15), (5.267, -28, 3230, 0.00095, -21),
                     (5.31, -12.5, 5030, 0.00044, -8), (5.312, -18.5, 1240, 0.00069, -28),
                     (5.365, -19.5, 5580, 0.00047, 4), (5.389, -24.5, 2560, 0.00088, -1),
                     (5.433, -28, 3120, 0.0018, -26), (5.4567, -19, 937, 0.0035, -27),
                     (5.4667, -9, 2610, 0.0009, -6.5), (5.5067, -26.5, 5140, 0.0019, -6),
                     (5.511, -29.5, 860, 0.0028, -6), (5.5476, -29, 1860, 0.0011, 4.5),
                     (5.592, -27.5, 820, .0018, -32), (5.629, -33, 3530, 0.001, 0),
                     (6.026, -24.5, 2130, 0.0002, -12), (6.108, -34, 2140, 0.0007, -14),
                     (6.1872, -28.5, 2370, 0.0013, -11), (6.449, -32.5, 2420, 0.0025, -22),
                     (6.455, -21, 5730, 0.0018, -37), (6.485, -25, 2300, 0.00082, -4),
                     (6.521, -30, 6180, 0.0022, -2), (6.546, -22.5, 1190, 0.0031, -7),
                     (6.5472, -13.5, 3640, 0.00026, -8), (6.583, -29, 2920, .0015, -5),
                     (6.611, -21.5, 2480, 0.0057, -27), (6.622, -26, 3700, 0.0019, -14),
                     (6.657, -25, 3300, .002, -15), (6.7051, -22.5, 3280, 0.00058, -3.5),
                     (6.7193, -33, 1210, 0.0023, 5.5), (6.742, -17, 2470, 0.0015, -4),
                     (6.746, -27, 1120, 0.0026, -20), (6.756, -16.5, 2440, 0.0035, -35),
                     (6.771, -22, 3800, 0.00059, 2), (6.771, -27, 1060, 0.0022, -14),
                     (6.907, -33.5, 2230, 0.0018, -3), (6.9253, -27, 5880, 0.0021, 4.5),
                     (6.944, -33.5, 2770, 0.0012, 2.5), (6.981, -28, 3900, 0.0015, 4),
                     (7.0032, -27.5, 4230, 0.0022, -10), (7.076, -21, 1810, 0.00087, -6),
                     (7.132, -24.5, 3630, 0.0053, -13), (7.152, -29, 2670, 0.0026, -18),
                     (7.1667, -18.5, 2650, 0.001, -13), (7.2165, -32, 3140, 0.0026, -10),
                     (7.232, -31, 2200, 0.0027, -20), (7.25, -33, 1890, 0.0039, -18),
                     (7.286, -37, 1740, 0.0035, -20), (7.296, -28, 3630, .0012, -14),
                     (7.318, -39, 1900, .003, -20), (7.341, -30.5, 3160, 0.0013, 3),
                     (7.376, -32, 5300, .0012, -2), (7.4491, -22.5, 5330, 0.00078, -6.5),
                     (7.4722, -11, 3730, 0.0012, -20), (7.484, -13, 2040, 0.0019, -22),
                     (7.528, -23.5, 5100, 0.0017, -14), (7.544, -24.5, 4740, 0.0018, -16),
                     (7.57, -27, 3020, .003, -19), (7.597, -22, 4640, 0.0016, -15),
                     (7.63, -27, 5360, .0016, -11), (7.6491, -28.5, 5900, 0.0018, 5),
                     (7.67, -24.5, 5940, 0.001, 1), (7.687, -26, 1260, 0.0022, 1),
                     (7.715, -27, 1250, 0.0027, -12), (7.755, -20.5, 5620, 0.0013, -6),
                     (7.774, -20, 3610, 0.0043, 0), (7.796, -33, 1520, 0.0017, -6),
                     (8.226, -34.5, 1710, 0.0021, -30), (8.6624, -32, 2340, 0.00087, -0.5),
                     (8.717, -37, 6580, 0.0011, 2), (8.754, -9, 1983, 0.0047, -32.5),
                     (8.776, -15.5, 5880, 0.0016, -5), (8.802, -19, 980, 0.004, -23),
                     (8.801, -13.5, 5470, 0.0016, -3)]
    tick_colour_db = 6.5  # every film tears with a colour of its own (std)
    tear = [(300, -13.0), (1500, -8.0), (3000, -1.5), (5500, 11.5), (8000, -2.0), (11000, 3.5),
            (16000, -8.5)]
    out = np.zeros((2, N))
    bursts = np.vstack([single_bursts, stray_pops(flow_db, bubble_hz)])
    draws = rng.standard_normal((len(bursts), 4))
    for (s, db, hz, life, tick_db), (place, lag, glide, shape) in zip(bursts, draws):
        sides = panned(along(LEAN, hz) + 1 + 1.7 * place)
        cavity = ring(hz, life, attack=0.0012, rise=0.045 + 0.084 * glide, lag=1.26 + 0.16 * lag,
                      bends=wavering(CAVITY_WAVER))
        # the gap between the shrimp is irregular, so it has a second, shorter mode
        upper = ring(hz * (1.655 + 0.278 * shape), life * .5, attack=0.00066, lag=1 - lag)
        splat = click(0.0042, [(hz * 0.69, -35), (hz * .5, -6), (hz, 0), (hz * 1.44, -6), (hz * 4, -28)])
        tick = click(0.002, [(f, level + tick_colour_db * rng.standard_normal()) for f, level in tear])
        add(out, s, amp(db - 0.52) * cavity * sides)
        add(out, s, amp(db - 22.0) * upper * sides)
        add(out, s, amp(db - 20.5) * splat * sides)
        add(out, s + 0.00025, amp(db + tick_db + 0.36) * tick)
    return out + fragments(bursts) + neighbours(bursts)


def scene():
    """Bowl and bottle, their reflections and the quiet kitchen."""
    def thin(x, hz):
        return signal.sosfilt(signal.butter(4, hz, "high", fs=SR, output="sos"), x)

    flow_db, bubble_hz = pouring()
    # small things radiate no deep bass, the bottle even less than the bowl
    bowl = thin(stream(flow_db, bubble_hz) + plunges() + pops(flow_db, bubble_hz), hz=62.4)
    bottle = thin(sputters() + snaps() + creases() + glugs(), hz=79)
    near = bowl + bottle
    return near + amp(-6) * bowl_echoes(near) + amp(-10.0) * kitchen(near) + background()


def record(dry):
    """Clip at full scale, then remove everything above the band limit."""
    top_hz = 16100
    return filtered(np.clip(dry, -1, 1), lambda hz: hz < top_hz)


dry = scene()
out = record(dry)
generate_wav(out)
```